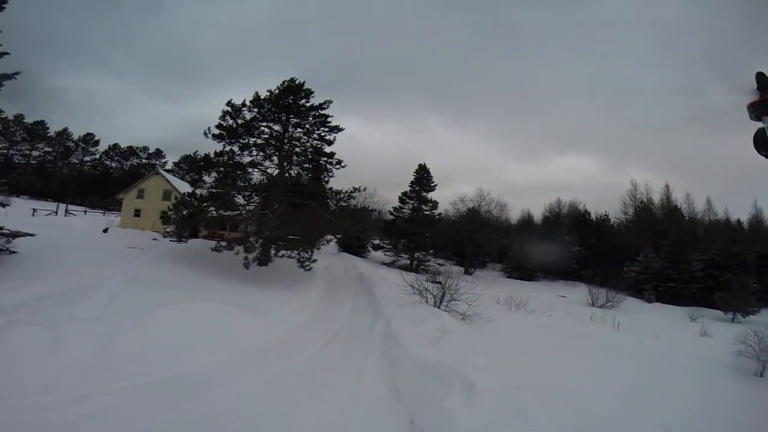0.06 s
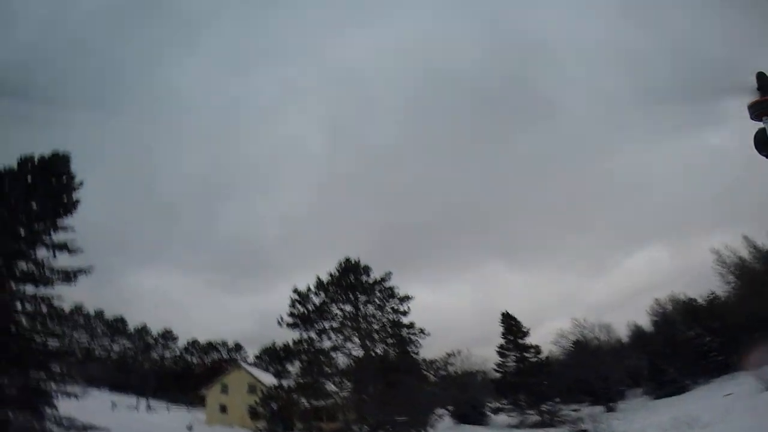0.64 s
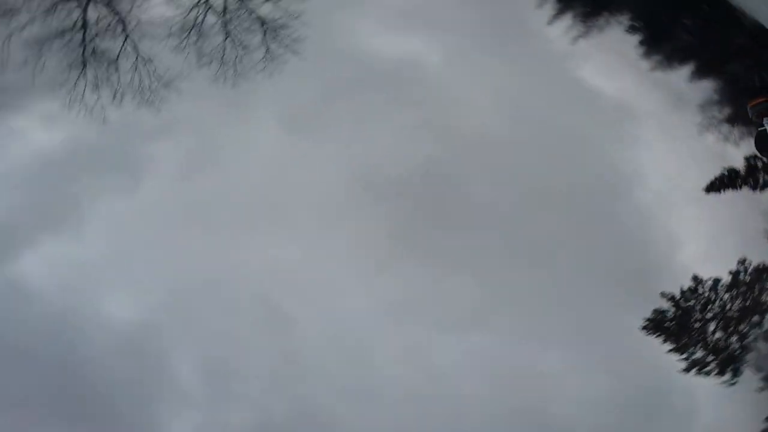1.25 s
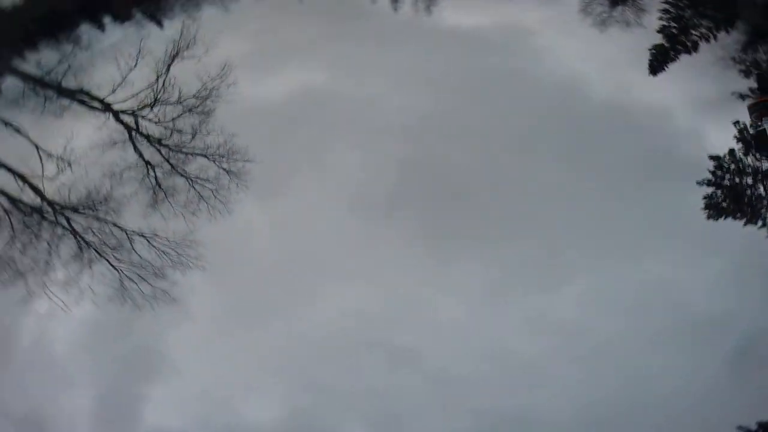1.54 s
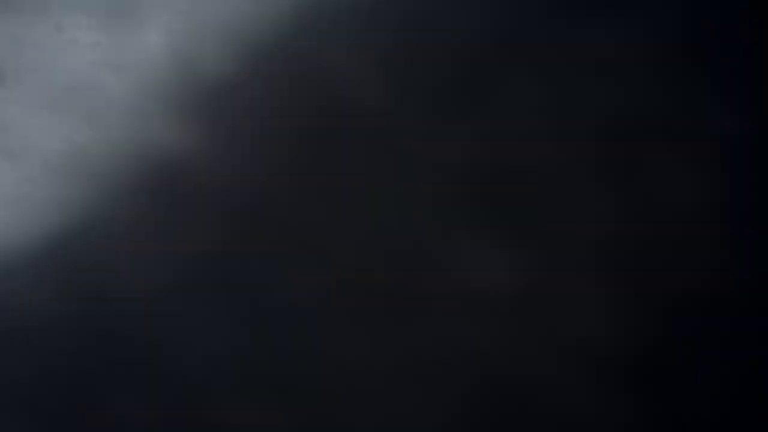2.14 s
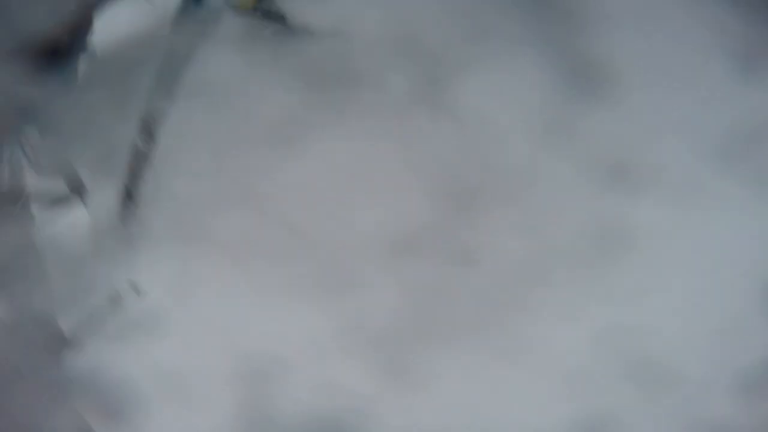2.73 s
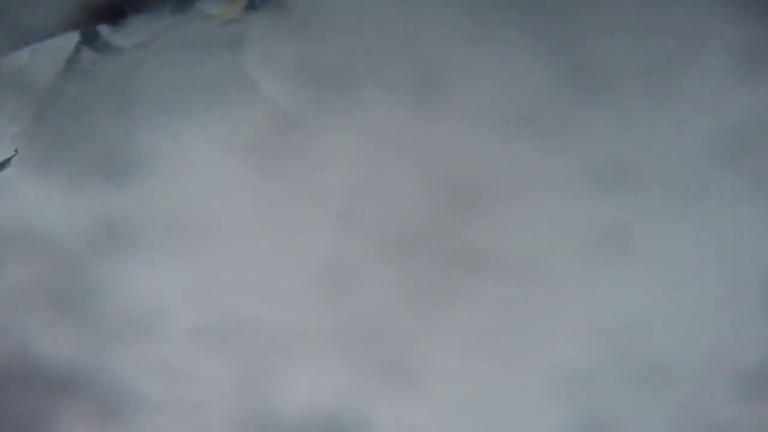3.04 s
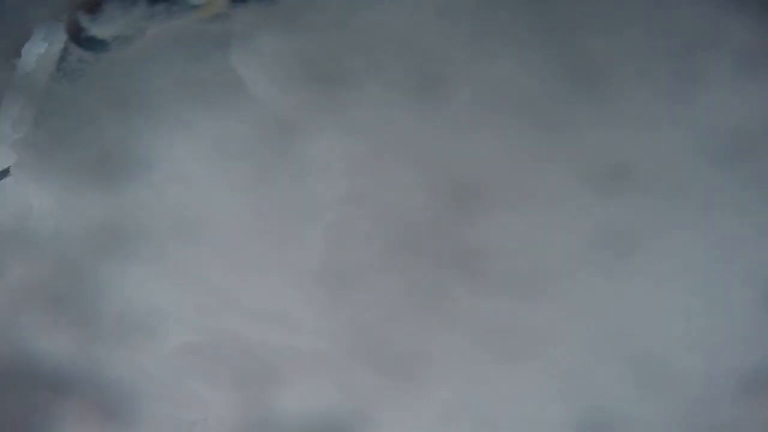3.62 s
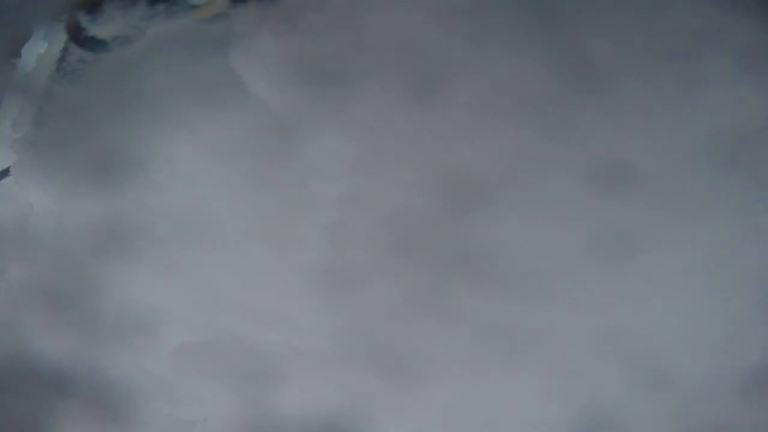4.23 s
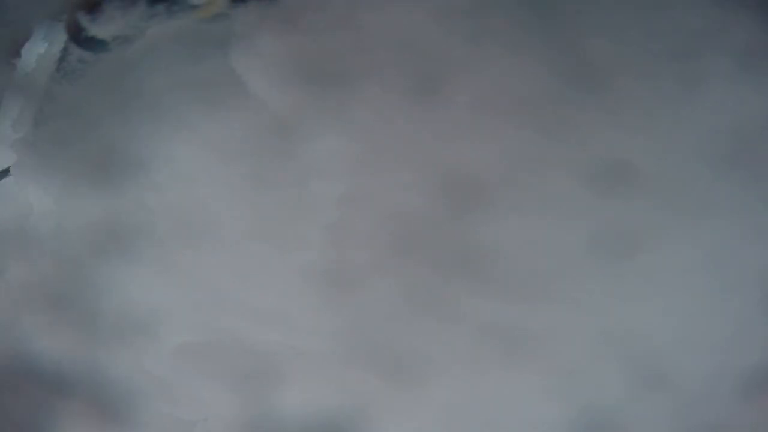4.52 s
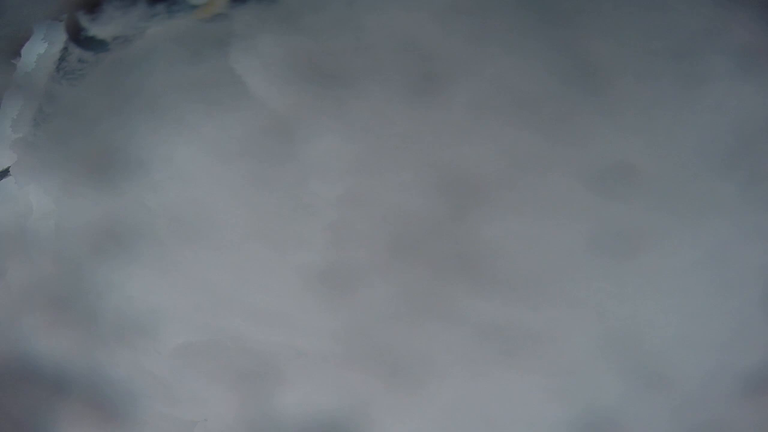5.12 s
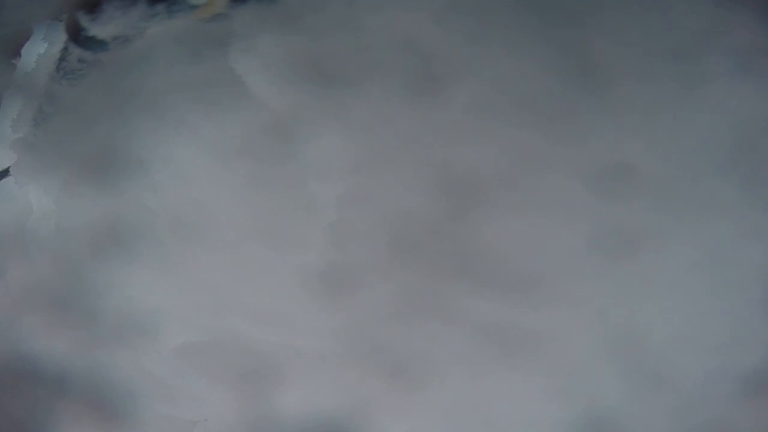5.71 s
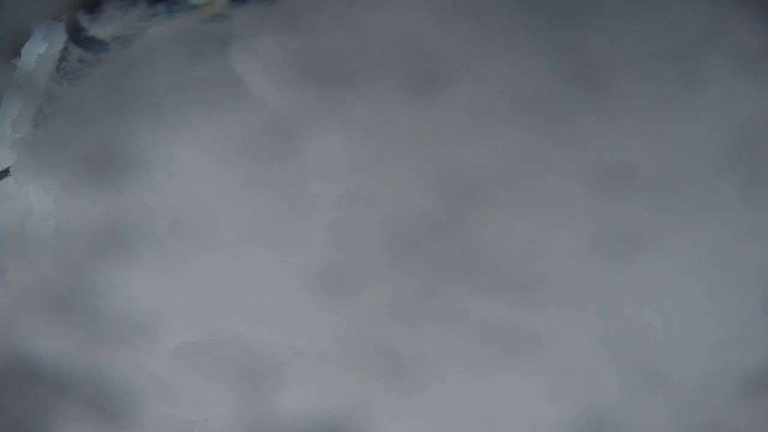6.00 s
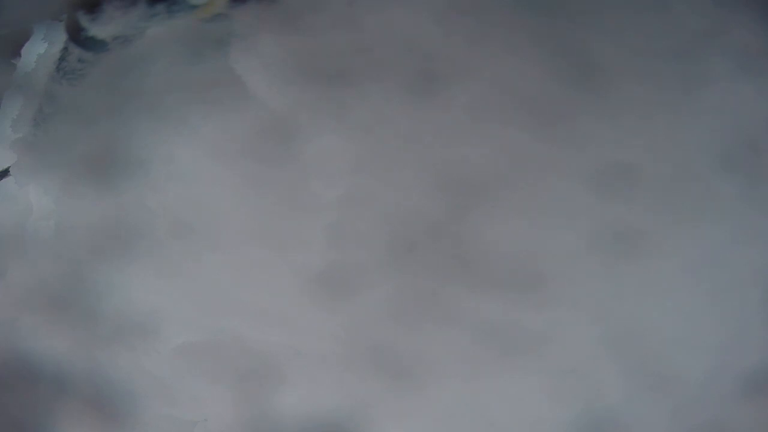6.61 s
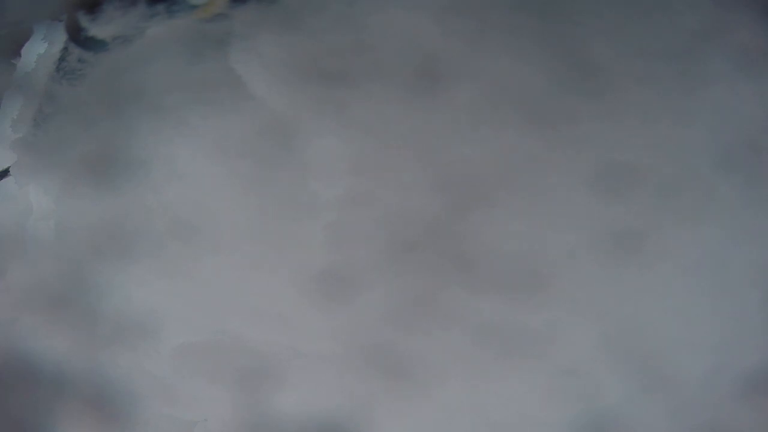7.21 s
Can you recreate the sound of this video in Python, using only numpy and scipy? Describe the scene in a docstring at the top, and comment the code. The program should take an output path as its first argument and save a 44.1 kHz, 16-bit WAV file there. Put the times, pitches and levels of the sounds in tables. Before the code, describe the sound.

Four propellers hum and rasp right beside a microphone mounted on a small drone, with air buffeting it. A sudden cluster of hard knocks against tree branches stops the motors. Irregular clacks and gritty scrapes follow for about a second and a half as the craft tumbles into the snow. The rest is very quiet outdoor air: a soft hiss, gentle rumbles and occasional dull shifts of snow.

```python
"""A small quadcopter is heard from its own camera: four rotors at slightly different speeds beat together
while air buffets the microphone. At about 1.7 s it hits a bare tree, and twigs stall the rotors.
The frame knocks and scrapes down through the branches into the snow, each contact exciting its modes.
From about 3.3 s it lies still: two parts of the frame ring on faintly, a hiss swells,
and wind, soft thumps in the snow with their deep rumble, and a few ticks reach the microphone."""
import sys
import numpy as np
from scipy import signal
from scipy.fft import rfft, irfft, next_fast_len
from scipy.io import wavfile

SR = 44100
rng = np.random.default_rng(int(sys.argv[2]) if len(sys.argv) > 2 else 0)


def pcm_store(signal):
    """Save signal as 16-bit PCM."""
    levels = np.round(np.clip(np.atleast_2d(signal), -1, 1) * 32767)
    wavfile.write(sys.argv[1], SR, levels.astype(np.int16).T)


N = 324135
STALL_S, AT_REST_S = 1.745, 3.33

# Rotor speeds as the craft pitches up: time_s, then turns_per_s for each of the four rotors
ROTOR_SPEEDS = [(.2, 82.1, 88.2, 86.1, 85), (.5, 83, 86.9, 85.2, 84.6), (.72, 82.2, 87.5, 85.9, 83.6),
                (1.05, 81.3, 86.8, 85.6, 82.6), (1.65, 80.9, 86.6, 85, 83.2)]
# Balance of each rotor: blade_tone_db, once_per_turn_db, overtones_db, motor_whine_db
ROTOR_BALANCE = [(-2, -9.5, -1, -30), (-7, -13.5, -4.5, -33), (-13, -19.5, -3, -40.5),
                 (-15, -20, 0.5, -47.5)]
# Overtone envelope of a rotor: multiple_of_turning_rate, relative_db
ROTOR_OVERTONES = [(3, -10.5), (4, -6.5), (7, -15), (8, -12), (10, -19.5), (19, -20), (28, -23.5),
                   (34, -34), (60, -42)]
# Course of the rotor tones in flight: time_s, gain_db, extra_overtone_gain_db
FLIGHT_GAINS = [(0, -18.5, -7), (.15, -19.5, -9.5), (.25, -19, -4), (.42, -15.5, -7.5), (.65, -17.5, -7.5),
                (.82, -18, -3.5), (1.1, -18, -2), (1.4, -23, -2), (1.72, -19.5, -2.5)]
# Spectrum of air torn by the blades: frequency_hz, relative_db
RUSH_SPECTRUM = [(60, -20.5), (200, -14.5), (450, -2.5), (900, -9), (1550, 6), (1900, 3.5), (2350, 6.5),
                 (2650, -1), (3050, -29.5), (4600, -15), (7400, -22), (10000, -20), (15500, -25)]
# Switching whistle of the motor controllers: pitch_hz, level_db
WHISTLE = (8032, -50)
# Spells of rough air at the blades: middle_s, level_db, half_length_s
ROUGH_SPELLS = [(0.335, -39.5, 0.057), (0.465, -41, .025), (0.917, -30.5, 0.0098), (1.115, -30, 0.019),
                (1.302, -37, 0.023)]
# Airflow past the microphone in flight and fall: time_s, level_db
AIRFLOW = [(0, -64), (.62, -56), (.78, -44.5), (1.33, -38.5), (1.45, -31), (1.8, -29.5), (1.87, -46),
           (2.5, -46), (3.1, -57)]
# Gusts, and the deep rumble of soft thumps in the snow: peak_s, level_db, decay_db_per_s
LOW_SURGES = [(3.69, -37.5, 143), (3.89, -41.5, 130), (4.119, -42, 7), (5.26, -35, 106), (6.085, -39, 301),
              (6.72, -57, 34.5), (7.279, -47, 101.5)]
# Spectra of deep buffeting and of the higher churn of air: frequency_hz, relative_db
BUFFET_SPECTRUM = [(12, -11.5), (30, 7), (110, -12.5), (500, -52), (1500, -75.5)]
CHURN_SPECTRUM = [(60, -10.5), (130, 7.5), (300, -3.5), (500, -21), (1200, -35.5)]
# Swell of the faint hiss: time_s, level_db
HISS_LEVELS = [(0, -79), (3.4, -68.5), (3.75, -64), (4.2, -57.5), (7.3, -57)]
# Spectrum of that hiss: frequency_hz, relative_db
HISS_SPECTRUM = [(59, -28), (100, 1.5), (297, -6), (983, -15.5), (9460, -21.5), (15000, -20.5)]
# Blows of branches on the frame: start_s, ring_peak_db, ring_hz, crack_relative_db, crack_hz
BRANCH_BLOWS = [(1.6673, -3, 2250, -26, 3500), (1.682, -12, 1800, -20, 4200),
                (1.719, -1.5, 2000, -15, 5500), (1.7275, -4.5, 2400, -4, 5800),
                (1.736, -4, 1400, -20, 5500), (1.7623, 9.5, 2150, -18, 3870),
                (1.788, 1.5, 2000, -11.5, 6000), (1.798, -5.5, 2100, -22, 3500),
                (1.9412, -2.5, 1850, -9, 6740), (2.1351, -10.5, 2600, -1.5, 4020),
                (2.3772, -5, 1850, -9, 4800), (2.4168, -8, 2000, -8, 5600), (2.4488, 4.5, 1700, -16, 3800),
                (2.4864, -3, 1800, -16, 3500), (2.4985, 0.5, 2200, -1, 3960),
                (2.5182, -5.5, 1950, -16, 3500), (2.569, -6, 2100, -18, 5000),
                (2.6207, -3, 2200, -3.5, 5900), (2.6266, -5, 2050, -10, 5600),
                (2.7292, -10, 1900, 0.5, 5700), (2.801, -4.5, 2250, 1, 3240), (2.8085, 0.5, 2200, -1, 3250),
                (2.8538, -2, 1900, -1, 4830), (2.8874, 1.5, 2200, -5.5, 4600),
                (2.946, -9, 1800, -5.5, 5500), (3.224, -8, 2350, -10, 6200)]
# Modes of the frame and camera shell, bright ring and low thud: pitch_hz, width_hz, gain_db
SHELL_MODES = [(1510, 710, 3), (1970, 520, 14), (3214, 1500, -10), (4080, 360, -8), (5668, 560, -13),
               (6940, 170, -18.5)]
THUD_MODES = [(230, 120, -2), (380, 170, -2), (920, 340, -6)]
# Spectrum of snow grains sizzling on the shell: frequency_hz, relative_db
GRIT_SPECTRUM = [(1500, -12), (3100, 5), (4100, -4.5), (4800, -2), (5400, 6.5), (6100, 0.5), (6900, 2),
                 (7800, -8), (9500, -2.5), (15500, -6.5)]
# Heavy jolts of the whole craft: start_s, peak_db, pitch_hz, t60_s
JOLTS = [(1.671, -1, 290, 0.019), (1.7088, -1.5, 360, 0.022), (1.7465, -7, 190, 0.031),
         (1.7883, 1, 344, 0.027), (2.5008, 6, 386, 0.02), (2.5216, -2, 364, 0.01),
         (3.227, -15.5, 326, 0.04)]
# Flicks of twigs and snow crystals: start_s, peak_db, pitch_hz
TICKS = [(1.7335, -19, 9000), (2.0648, -7, 2800), (2.1085, -7.5, 3040), (2.3061, -2, 2730),
         (2.3375, -11, 4400), (2.363, -7.5, 3300), (3.338, -42, 1990), (4.212, -38, 12900),
         (4.365, -44, 2200), (5.738, -47, 9340)]
# Slides along bark and snow: start_s, length_s, gain_db, growth_db, grit_relative_db, hollow_hz
SLIDES = [(1.771, 0.067, -26, -4, -17, 1980), (1.858, 0.13, -39.5, -5.5, -1.5, 2100),
          (1.956, 0.32, -25, 7, -8, 1876), (2.21, 0.049, -15, -1, -4, 2160),
          (2.282, 0.046, -19, 4, -6.5, 2350), (2.334, 0.046, -14, 0, -3, 2310),
          (2.366, 0.097, -22.5, -22.5, -1, 1910), (2.474, 0.0078, -22.5, 4, -23, 1860),
          (2.606, 0.007, -15.5, -4, -27, 1580), (2.633, 0.096, -29, -10, -10, 2210),
          (2.701, 0.0248, -27.5, 0.5, -1, 2250), (2.803, 0.077, -37.5, 9, -15, 2060),
          (2.938, 0.18, -26, -16, -10.5, 1790), (3.138, 0.068, -56, 14.5, -10, 1960),
          (3.216, 0.022, -29.5, -2, -1.5, 2300), (3.269, 0.021, -35, -4, -6.5, 2200)]
# Thumps and shuffles in the snow: start_s, level_db, length_s
THUMPS = [(2.452, -24, 0.022), (2.473, -28.5, 0.018), (4.311, -50, 0.032), (5.248, -41, 0.019),
          (6.076, -47.5, 0.035), (6.711, -41, 0.031), (6.782, -45, 0.023), (6.858, -43.5, 0.013),
          (7.184, -45, 0.062), (7.246, -44, 0.069)]
# Spectrum of yielding snow: frequency_hz, relative_db
SNOW_SPECTRUM = [(60, -2), (300, 2), (400, -4), (550, -23.5), (1000, -34), (3000, -60)]
# Two steady tones of the frame: pitch_hz, gain_db
FRAME_MODES = [(258, -61), (361, -56.5)]
# Swell and fade of their ring: time_s, gain_db
RING_ENVELOPE = [(2.5, -61), (2.9, -4.5), (4.1, -1), (4.6, -12), (6, -37)]
# Brief rings of struck frame parts: start_s, peak_db, pitch_hz, t60_s
PINGS = [(2.626, -19, 2144, .11), (2.887, -22, 1863, .12)]

TIME = np.arange(N) / SR


def from_db(db):
    """Amplitude grows tenfold for every 20 dB."""
    return 10 ** (np.asarray(db) / 20)


def unit_rms(x):
    """Normalisation to unit power."""
    return x / np.sqrt(np.mean(x ** 2) + 1e-20)


def unit_peak(x):
    """Normalisation to unit height."""
    return x / (np.abs(x).max() + 1e-12)


def since(start_s):
    """Elapsed seconds, zero before the start."""
    return np.maximum(TIME - start_s, 0)


def curves(rows):
    """Linear interpolation of each column over time."""
    times, *columns = np.transpose(rows)
    return [np.interp(TIME, times, column) for column in columns]


def gain_at(spectrum, frequency):
    """Interpolation of a spectrum in decibels over log frequency, returned as amplitude."""
    points, db = np.transpose(spectrum)
    return from_db(np.interp(np.log(frequency + 1e-9), np.log(points), db))


def colour(x, spectrum):
    """Filtering by multiplication of spectra, at unit power."""
    size = next_fast_len(N)
    hz = np.arange(size // 2 + 1) * SR / size
    shaped = irfft(rfft(x, size) * gain_at(spectrum, hz), size)
    return unit_rms(shaped[:len(x)])


def drift(rate_hz):
    """Low-passed noise gives a slow random fluctuation of unit power."""
    step, settle = 20, 2000    # samples
    pole = np.exp(-2 * np.pi * rate_hz * step / SR)
    noise = rng.standard_normal(N // step + settle + 2)
    slow = signal.lfilter([1], [1, -2 * pole, pole ** 2], noise)[settle:]
    return np.interp(np.arange(N) / step, np.arange(len(slow)), unit_rms(slow))


def resonate(x, modes):
    """Modal superposition: damped resonators respond in parallel, with alternating signs."""
    out = 0
    for k, (hz, width_hz, db) in enumerate(modes):
        r = np.exp(-np.pi * width_hz / SR)
        band = signal.lfilter([1, 0, -1], [1, -2 * r * np.cos(2 * np.pi * hz / SR), r * r], x)
        out = out + (-1) ** k * from_db(db) * (1 - r * r) / 2 * band
    return out


def grains(per_s, spread_db):
    """Shot noise: independent clicks, many small and a few large."""
    sizes = from_db(spread_db * np.minimum(rng.exponential(1, N), 4))
    signs = rng.choice([-1, 1], N)
    return sizes * signs * (rng.random(N) < per_s / SR)


def rotor_wave(orders, gains, turns, size=2048):
    """Fourier series: pressure that repeats every turn holds only harmonics of the turning rate."""
    spectrum = np.zeros(size // 2 + 1, complex)
    spectrum[orders] = gains * np.exp(2j * np.pi * rng.random(len(orders)))
    one_turn = irfft(spectrum) * size / np.sqrt(2)
    return np.interp(turns % 1 * size, np.arange(size), one_turn, period=size)


def rotors(trim=0.0015, slowing_per_s=1.2, stall_db_per_s=228.5, flex=0.003305, chop=0.24, rush_db=-21.5):
    """Beating: four two-bladed rotors sound at nearby pitches until twigs stall them."""
    run_down = np.exp(-slowing_per_s * since(STALL_S))
    speeds = [speed * (1 + trim * drift(6)) * run_down for speed in curves(ROTOR_SPEEDS)]
    flight_db, overtone_db = curves(FLIGHT_GAINS)
    orders = np.arange(3, 61)
    tones, whines, passes = 0, 0, 0
    for speed, (blade_db, turn_db, rasp_db, whine_db) in zip(speeds, ROTOR_BALANCE):
        turns = np.cumsum(speed) / SR + rng.random()
        flexed_turns = turns + np.cumsum(speed * flex * drift(40)) / SR    # blades bend in rough air
        rasp = rotor_wave(orders, gain_at(ROTOR_OVERTONES, orders), flexed_turns)
        tones += rotor_wave([1, 2], from_db([turn_db, blade_db]), turns)
        tones += rasp * from_db(rasp_db + overtone_db + 2.5 * drift(12))
        whines += motor_whine(turns, whine_db)
        passes += from_db(rasp_db) * (np.cos(2 * np.pi * turns) + np.cos(4 * np.pi * turns)) / 2
    chopping = unit_rms(np.exp(chop * passes))    # passing blades modulate the rush of air
    rush = from_db(rush_db) * colour(rng.standard_normal(N), RUSH_SPECTRUM) * chopping
    flight = from_db(flight_db) * tones + rush + whines + controller_whistle()
    flight += blade_slap(turns)    # in step with the fourth rotor
    return flight * from_db(-stall_db_per_s * since(STALL_S))


def motor_whine(turns, level_db, octave_db=-20, waver_db=2.2):
    """Magnetic force ripple: three phases and seven pole pairs give 21 cycles a turn."""
    phase = 2 * np.pi * 21 * turns
    whine = np.sin(phase) + from_db(octave_db) * np.sin(2 * phase)
    return np.sqrt(2) * whine * from_db(level_db + waver_db * drift(13))


def controller_whistle(wander_hz=6):
    """Periodic switching in the motor controllers gives a thin, nearly steady tone."""
    pitch_hz, level_db = WHISTLE
    phase = 2 * np.pi * np.cumsum(pitch_hz + wander_hz * drift(30)) / SR
    return np.sqrt(2) * from_db(level_db) * np.sin(phase)


def blade_slap(turns, sharpness=4.5, uneven_db=3, steady_db=-44):
    """Amplitude modulation: blades in rough air pulse noise twice a turn, harder in short spells."""
    spells = sum(from_db(db) * np.exp(-((TIME - middle_s) / half_s) ** 2)
                 for middle_s, db, half_s in ROUGH_SPELLS)
    pulses = np.exp(sharpness * np.cos(4 * np.pi * turns))
    slaps = unit_rms(pulses * from_db(uneven_db * drift(90)))
    rasp = unit_rms(resonate(rng.standard_normal(N), SHELL_MODES[2:]))
    return (from_db(steady_db) + spells) * slaps * rasp


def wind_and_rumble(rise_s=0.018, calm_db=-60.5, flutter_db=5.5):
    """Low pressure fluctuations: the craft's airflow, gusts, and the deep rumble of thumps in the snow."""
    rumble = from_db(calm_db)
    for peak_s, db, decay_db_per_s in LOW_SURGES:
        rise = np.exp(-(np.maximum(peak_s - TIME, 0) / rise_s) ** 2)
        rumble = np.maximum(rumble, rise * from_db(db - decay_db_per_s * since(peak_s)))
    flow = from_db(curves(AIRFLOW)[0]) * (TIME < AT_REST_S)
    churn = (from_db(1) * flow + from_db(-17) * rumble) * colour(rng.standard_normal(N), CHURN_SPECTRUM)
    buffet = np.maximum(from_db(-1.5) * flow, rumble) * colour(rng.standard_normal(N), BUFFET_SPECTRUM)
    return from_db(flutter_db * drift(11)) * (buffet + churn)


def hiss():
    """Broadband noise under a slow envelope: faint at first, it swells after the crash."""
    return from_db(curves(HISS_LEVELS)[0]) * colour(rng.standard_normal(N), HISS_SPECTRUM)


def knocks(attack_s=0.00036, contact_s=0.0033, rattle_db=-27, rattle_t60_s=0.12, thud_db=-14, size=6000):
    """Impact excitation: each blow is a burst of tiny slips that rings, thuds and cracks, then rattles."""
    out, t = np.zeros(N), TIME[:size]
    rattle = from_db(rattle_db - 60 * t / rattle_t60_s)
    force = (1 - np.exp(-t / attack_s)) * (np.exp(-(t / contact_s) ** 2) + rattle)
    for start_s, peak_db, ring_hz, crack_db, crack_hz in BRANCH_BLOWS:
        slips, spray_noise, snap_noise = rng.standard_normal((3, size))
        # Each spot struck favours other modes and shifts the lowest two.
        modes = [(hz, width, db + 0.5 * rng.standard_normal()) for hz, width, db in SHELL_MODES]
        shift = ring_hz / SHELL_MODES[1][0]
        modes[:2] = [(hz * shift, width, db) for hz, width, db in modes[:2]]
        ring = unit_peak(resonate(slips * force, modes))
        thud = from_db(thud_db) * unit_peak(resonate(slips * force, THUD_MODES))
        snap = unit_rms(resonate(snap_noise, [(crack_hz, 1500, 0)]))
        spray = from_db(-4) * colour(spray_noise, GRIT_SPECTRUM)
        crack = from_db(crack_db) * unit_peak((snap + spray) * force)
        start = int(start_s * SR)
        out[start:start + size] += from_db(peak_db) * (ring + thud + crack)
    return out


def jolts_and_pings(size=9000):
    """Damped free vibration: the camera bounces on its mount, and struck parts of the frame ping."""
    out, t = np.zeros(N), TIME[:size]
    for start_s, peak_db, hz, t60_s in JOLTS + PINGS:
        start = int(start_s * SR)
        out[start:start + size] += from_db(peak_db - 60 * t / t60_s) * np.sin(2 * np.pi * hz * t)
    return out


def ticks(width_hz=750, slip_s=0.002, size=900):
    """Transient excitation: a twig or snow crystal slips on the shell and sounds one resonance."""
    out = np.zeros(N)
    for start_s, peak_db, hz in TICKS:
        slip = rng.standard_normal(size) * np.exp(-TIME[:size] / slip_s)
        start = int(start_s * SR)
        out[start:start + size] += from_db(peak_db) * unit_peak(resonate(slip, [(hz, width_hz, 0)]))
    return out


def slide_gain(start_s, length_s, db, growth_db, attack_s=0.0026, release_s=0.0022):
    """Friction noise follows contact force: a slide catches, presses harder or eases, and lets go."""
    progress = np.minimum(since(start_s) / length_s, 1)
    fade = np.maximum(start_s - TIME, 0) / attack_s + since(start_s + length_s) / release_s
    return from_db(db + growth_db * progress) * np.exp(-np.minimum(fade, 40))


def scrape(grains_per_s=8000, spread_db=3.5, clump_db=2.24, wander_db=3, hollow_width_hz=230):
    """Friction: grains of bark and snow sizzle and drive the shell, and a hollow resonance per slide."""
    clumps = from_db(clump_db * drift(120))
    rub = grains(grains_per_s, spread_db) * clumps
    ringing = 0
    for mode in SHELL_MODES:
        drive = grains(grains_per_s, spread_db) * clumps
        ringing += resonate(drive, [mode]) * from_db(wander_db * drift(35))
    shell_band = signal.butter(2, [1100, 6000], "band", fs=SR, output="sos")
    shell = from_db(-3) * unit_rms(signal.sosfilt(shell_band, ringing))
    body = from_db(-12) * unit_rms(resonate(rub, THUD_MODES[:2]))
    shell_gain, grit_gain, hollow = 0, 0, 0
    for start_s, length_s, db, growth_db, grit_db, hollow_hz in SLIDES:
        gain = slide_gain(start_s, length_s, db, growth_db)
        shell_gain = np.maximum(shell_gain, gain)    # the hardest slide of the moment leads
        grit_gain = np.maximum(grit_gain, gain * from_db(grit_db))
        hollow += gain * unit_rms(resonate(rub, [(hollow_hz, hollow_width_hz, 0)]))
    return shell_gain * (shell + body) + from_db(-2.5) * hollow + grit_gain * colour(rub, GRIT_SPECTRUM)


def snow_thumps():
    """Granular collapse: snow gives way in short, muffled crunches."""
    push = 0
    for start_s, db, length_s in THUMPS:
        age = since(start_s) / (length_s / 2)
        push += from_db(db) * age * np.exp(1 - age)
    return push * colour(grains(per_s=900, spread_db=1), SNOW_SPECTRUM)


def frame_ring():
    """Steady sines under a slow envelope: two tones of the frame swell and fade after the fall."""
    hum = sum(np.sqrt(2) * from_db(db) * np.sin(2 * np.pi * hz * TIME) for hz, db in FRAME_MODES)
    return from_db(curves(RING_ENVELOPE)[0]) * hum


def treble_swell(level_db=-67, middle_s=6.52, half_s=0.57, centre_hz=9410, width_hz=830):
    """Narrow-band noise under a Gaussian envelope: a faint, high hiss swells and fades."""
    envelope = from_db(level_db) * np.exp(-((TIME - middle_s) / half_s) ** 2)
    return envelope * unit_rms(resonate(rng.standard_normal(N), [(centre_hz, width_hz, 0)]))


def scene():
    """Superposition: flight, crash and the quiet after it add at one microphone."""
    crash = knocks() + jolts_and_pings() + scrape() + frame_ring()
    outdoors = wind_and_rumble() + hiss() + snow_thumps() + ticks() + treble_swell()
    return (rotors() + crash + outdoors)[None]


def record(dry):
    """Saturation and band limiting: the hardest blows overload the camera, and the top treble is cut."""
    low_pass = signal.ellip(10, 0.1, 70, 15300, fs=SR, output="sos")
    return signal.sosfilt(low_pass, np.clip(dry, -1, 1))


dry = scene()
out = record(dry)
pcm_store(out)
```